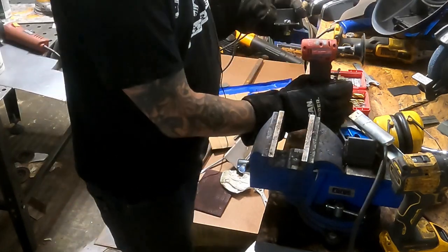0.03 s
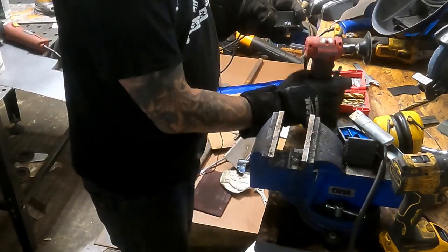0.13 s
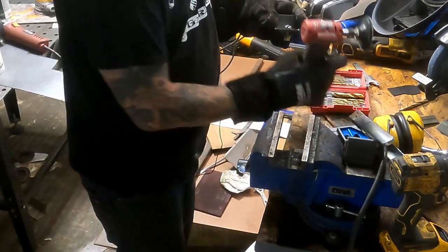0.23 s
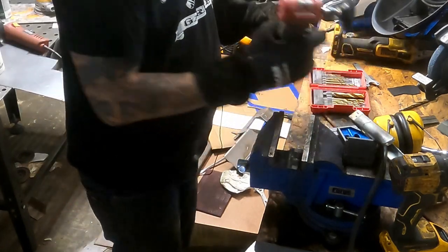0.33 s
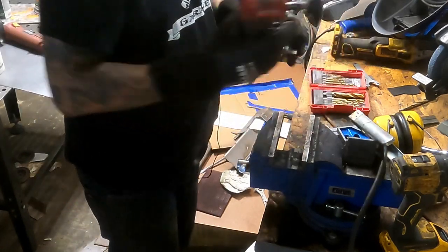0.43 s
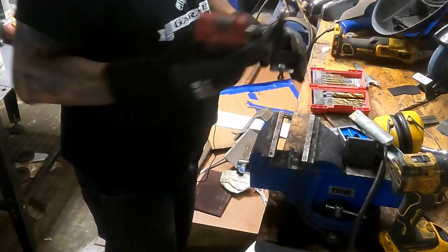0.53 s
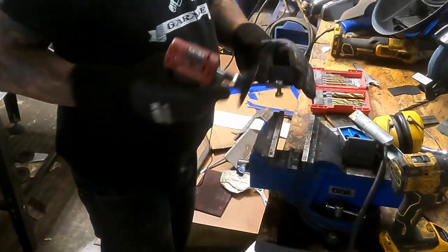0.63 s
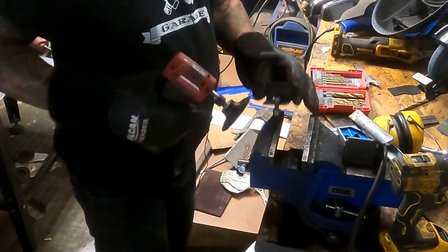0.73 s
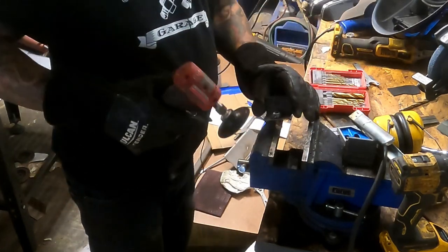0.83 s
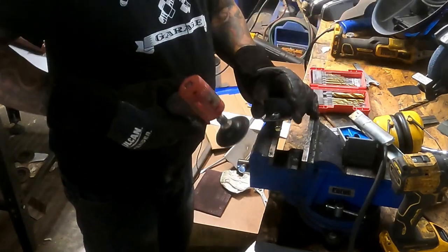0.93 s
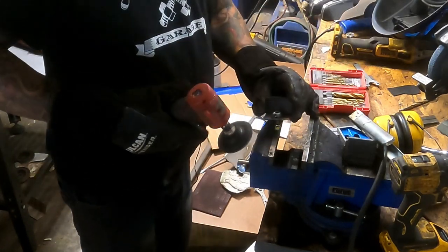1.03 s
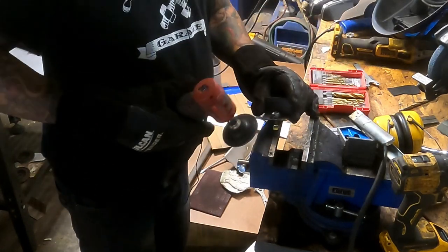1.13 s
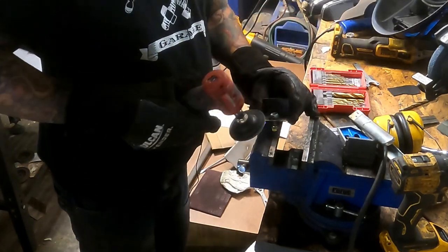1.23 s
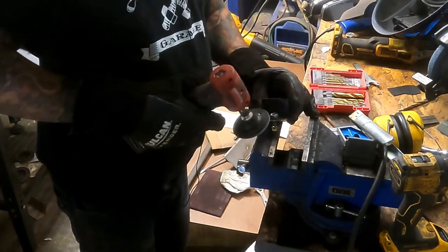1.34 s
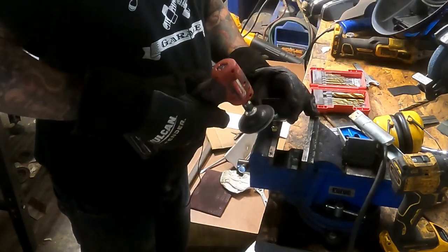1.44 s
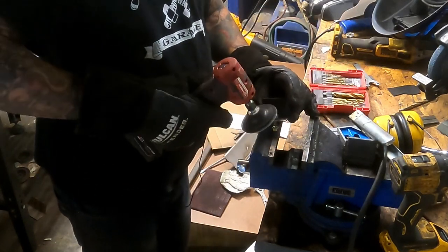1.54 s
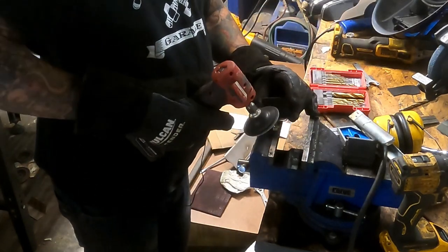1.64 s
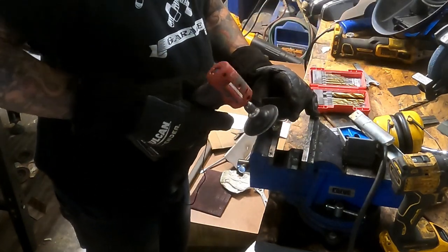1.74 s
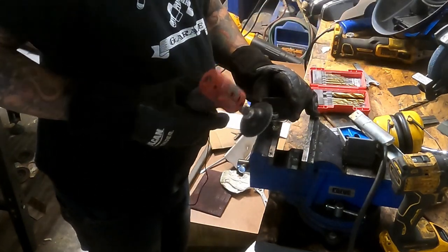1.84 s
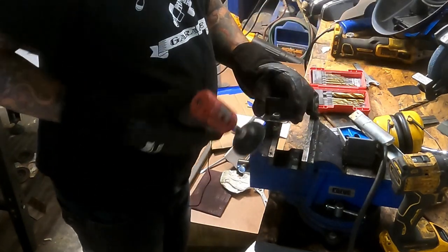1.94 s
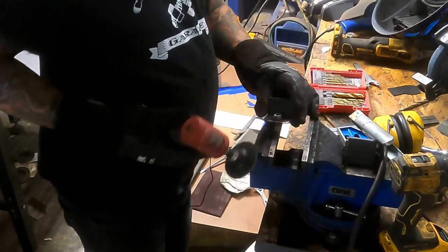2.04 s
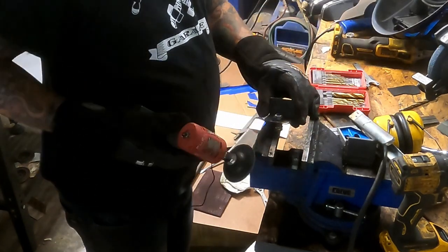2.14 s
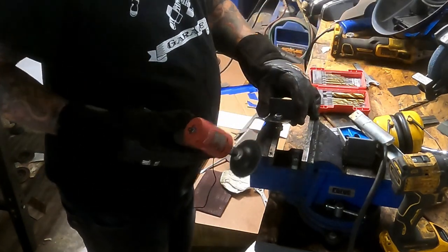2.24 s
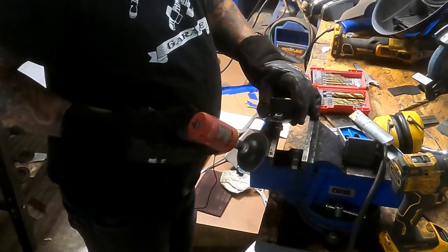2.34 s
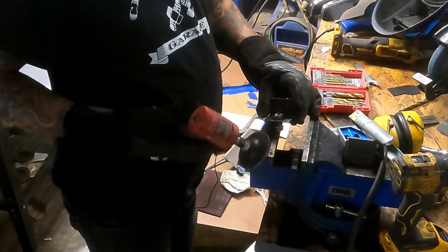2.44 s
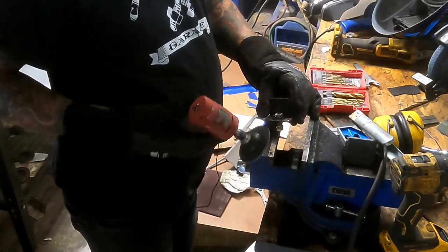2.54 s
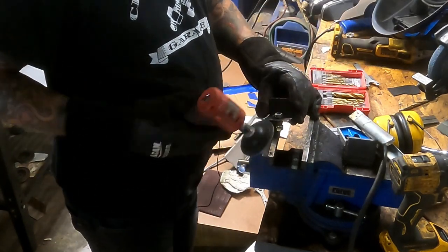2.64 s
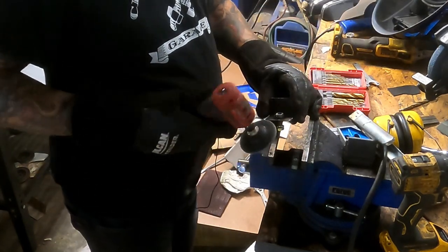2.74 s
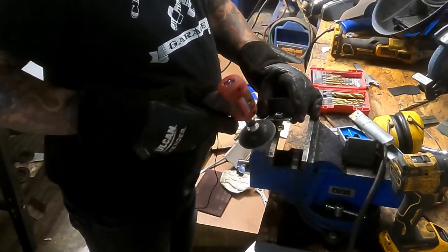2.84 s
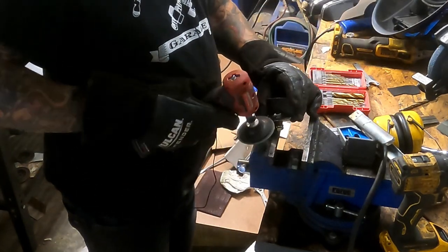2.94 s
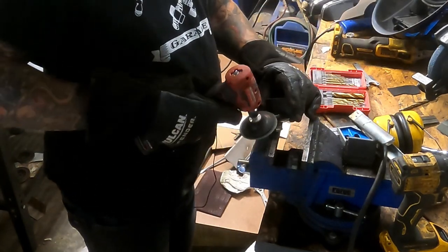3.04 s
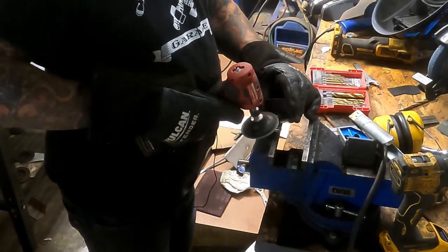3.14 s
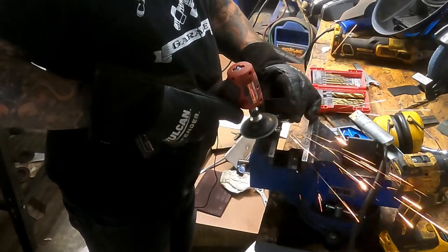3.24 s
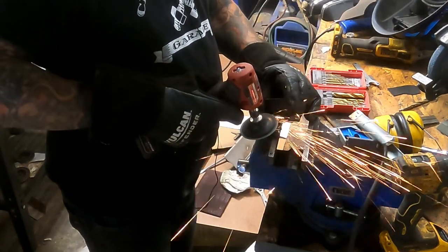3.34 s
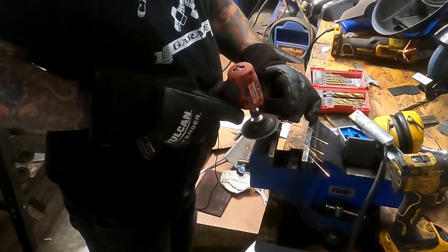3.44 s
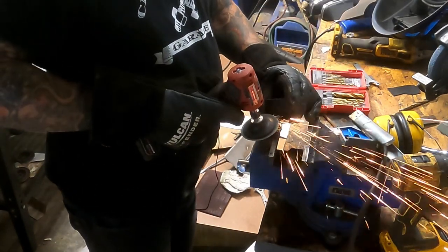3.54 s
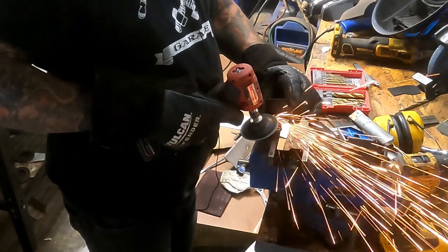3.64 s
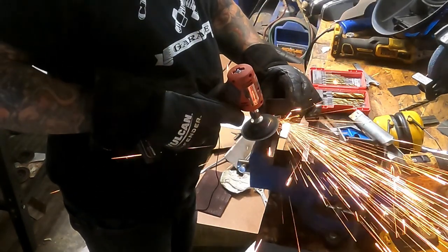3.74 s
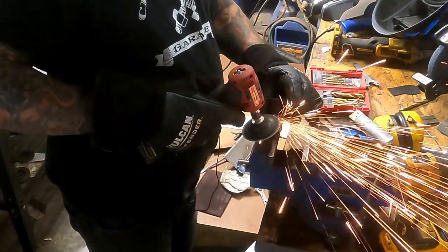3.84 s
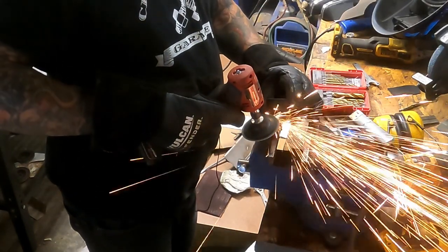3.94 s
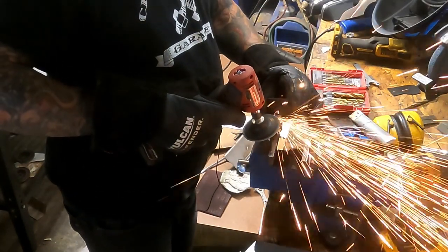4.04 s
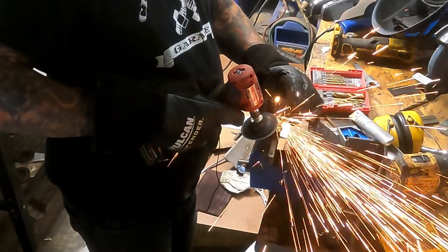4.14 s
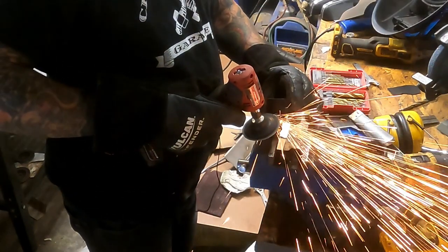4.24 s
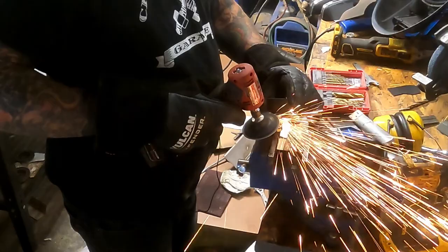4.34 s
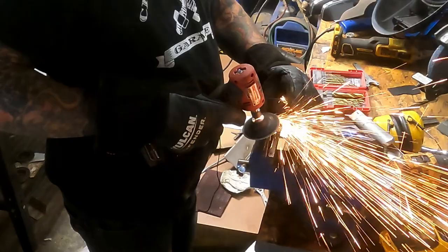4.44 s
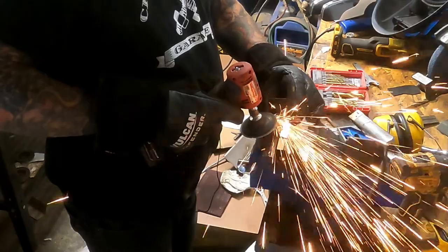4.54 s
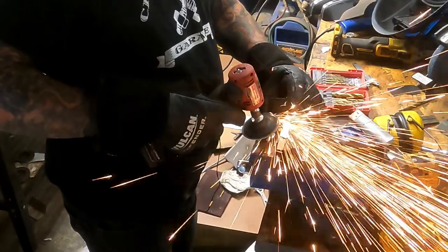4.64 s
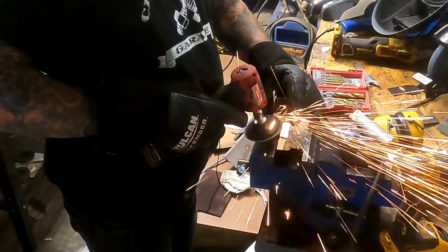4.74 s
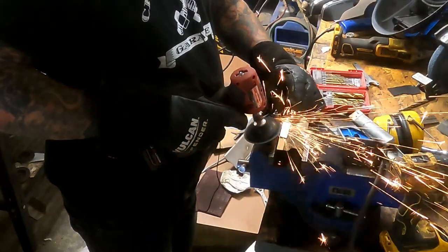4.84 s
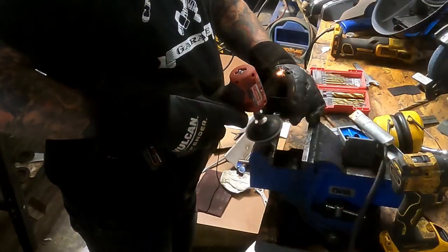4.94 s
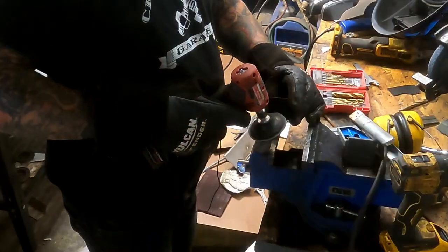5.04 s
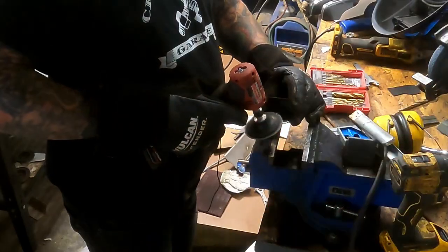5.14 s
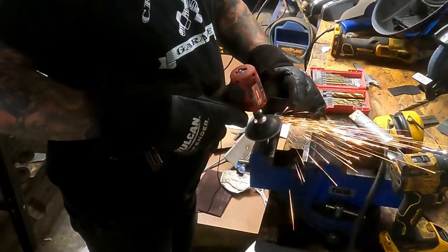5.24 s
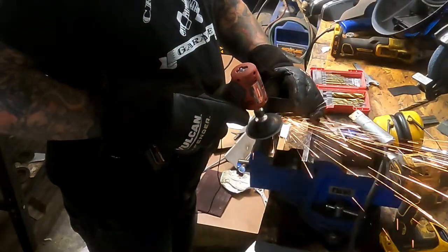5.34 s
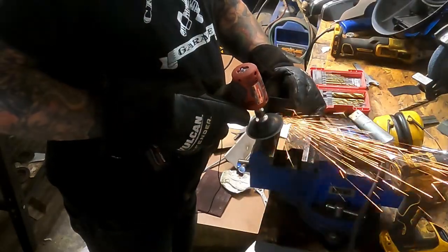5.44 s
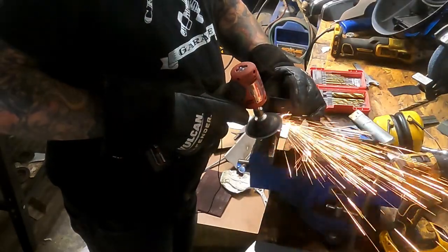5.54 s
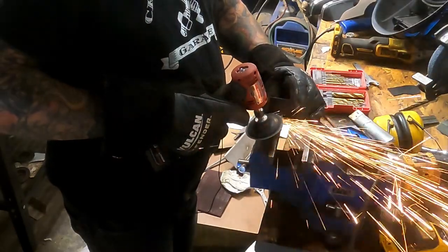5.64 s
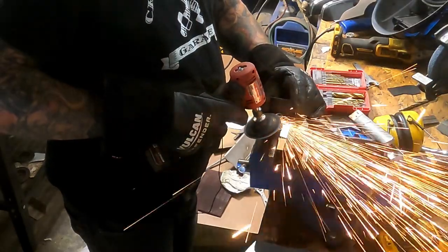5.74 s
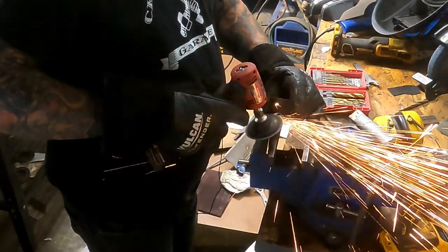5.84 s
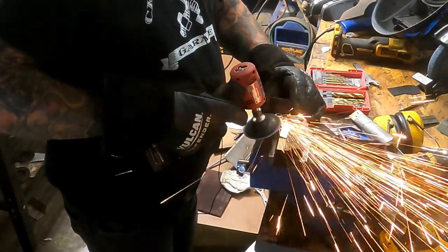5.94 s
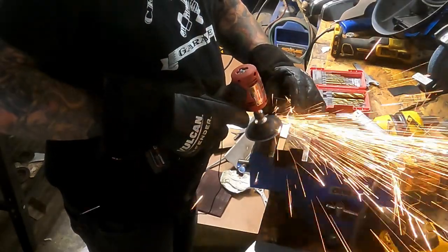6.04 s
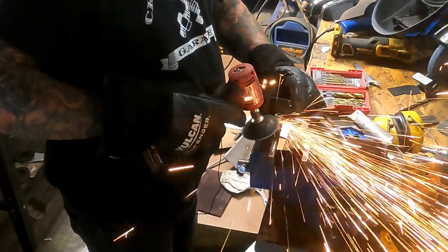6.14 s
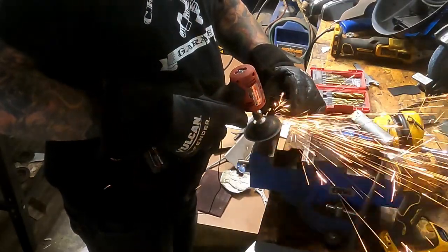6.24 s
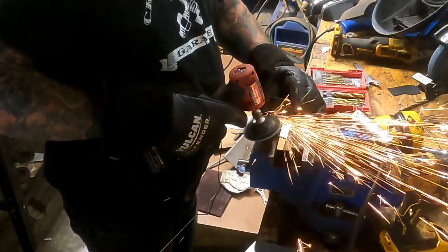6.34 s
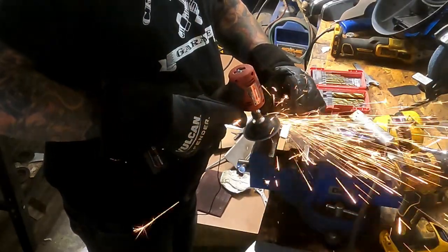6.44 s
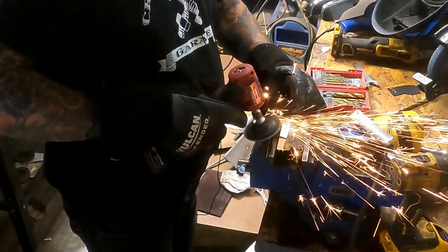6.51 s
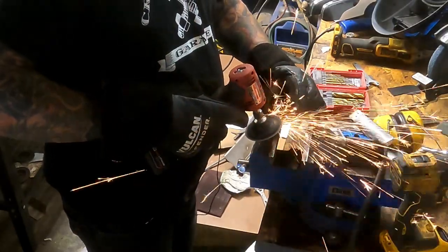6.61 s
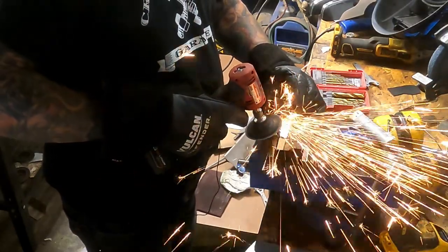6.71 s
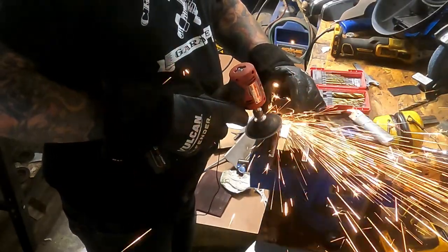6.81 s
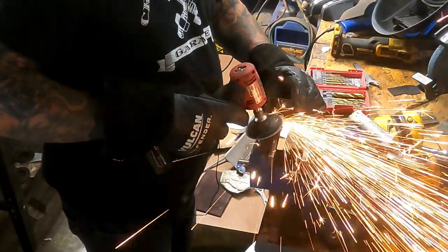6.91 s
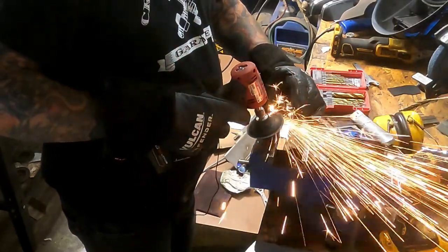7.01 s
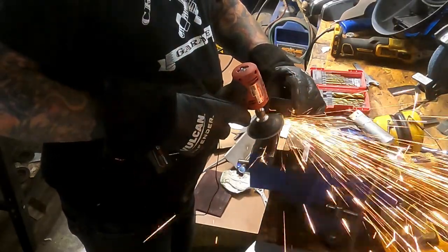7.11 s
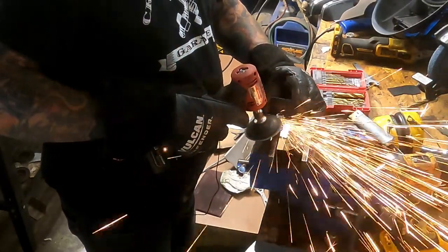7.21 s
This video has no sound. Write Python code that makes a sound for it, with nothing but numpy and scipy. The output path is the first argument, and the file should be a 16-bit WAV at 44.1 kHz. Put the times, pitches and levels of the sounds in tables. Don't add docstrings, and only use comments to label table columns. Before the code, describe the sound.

Close, nearly mono workshop sound: quiet room tone, sleeve rustles, a dull knock, a bright clink and a sharp set-down tick. After a quiet stretch, a handheld grinder is handled and started, rising swiftly into a whirr. Two short scrapes lead into a long, piercing metal grind whose pitch sags with each push. A short free-running gap follows, then a second harsh pass that continues to the cut. Background sinks beneath the loud grinding.

```python
import sys
import numpy as np
from scipy import signal
from scipy.fft import rfft, irfft
from scipy.io import wavfile
from scipy.ndimage import uniform_filter1d, minimum_filter1d, map_coordinates

SR = 44100
rng = np.random.default_rng(int(sys.argv[2]) if len(sys.argv) > 2 else 0)


def waveform_to_disk(signal):
    frames = np.transpose(np.atleast_2d(signal))
    scaled = np.clip(frames, -1, 1) * 32767
    samples = np.round(scaled).astype(np.int16)
    wavfile.write(sys.argv[1], SR, samples)


def boost_factor(decibels):
    exponent = np.asarray(decibels, float) / 20
    return 10 ** exponent


N = 320607
T = np.arange(N) / SR
TRIGGER_S, FIRST_TOUCH_S = 2.678, 3.197
BEARING_RATIO = 2.565


# (frequency [Hz], width [Hz], level [dB])
STEEL_MODES = [(800, 190, -28), (1050, 110, -22.5), (1336, 285, -19), (1686, 146, -12), (2076, 168, -4),
               (2300, 159, 0), (2584, 180, 0.5), (2890, 340, -6), (3430, 605, -7), (4996, 750, 0),
               (6340, 910, -6), (7210, 664, 0.5), (8200, 660, -5), (9300, 810, -5), (10270, 920, -0.5),
               (11800, 910, -1.5), (12880, 440, -8), (13440, 500, -13.5), (14520, 480, -12),
               (15360, 250, -17), (4340, 1180, -13)]
# (time [s], frequency [Hz], level [dB], half
# length [s])
CONTACT_CHANGES = [(3.715, 8100, 0.5, 0.3), (3.786, 12100, -6.5, 0.27), (3.85, 14500, 7.5, 0.35),
                   (3.95, 12900, 3, 0.44), (3.857, 2080, 0, .25), (7.15, 6340, 1, 0.092), (4.7, 4740, 3, 0.13),
                   (5.726, 6940, 7.5, 0.046), (5.916, 6760, 5.5, 0.099), (3.9, 2960, -4.5, 0.33),
                   (3.99, 2450, 4, 0.068), (4.311, 7300, 2, 0.15), (4.364, 2040, -4.5, 0.16),
                   (4.57, 12200, -3.5, 0.52), (4.735, 1850, 7.5, 0.77), (4.792, 2870, 11, 0.021),
                   (4.874, 8200, -5.5, 0.11), (4.5, 2630, 6, 0.019), (4.915, 2280, 6, 0.032),
                   (4.89, 6300, -3, 0.06), (5.735, 2070, -5, 0.08), (5.762, 3550, 4, 0.66),
                   (5.929, 2500, -6.5, 0.11), (5.933, 1660, 13.5, 0.16), (5.95, 2050, -3, 0.065),
                   (6.146, 6100, -6, 0.087), (6.142, 2270, 4.5, 0.017), (6.181, 2780, 8, 0.016),
                   (6.247, 11200, 2.5, 0.33), (6.47, 2490, -6, 0.13), (6.48, 7500, -6.5, 0.43),
                   (6.5, 4530, 5, 0.17), (6.638, 1980, 6.5, 0.24), (7.097, 4500, 5.5, 0.11),
                   (7.097, 1920, -14, 0.1),
                   (3.56, 1830, 7.5, 0.21), (3.56, 7000, 3, 0.12), (4.04, 8800, 2, .25), (3.78, 3500, 2.5, 0.1),
              (4.3, 14400, -4, 0.33), (4.75, 15400, -10, .08), (4, 12900, 3, 0.13), (5.3, 1450, 14, 0.092),
              (4.88, 1300, 16.5, 0.077), (4.76, 2800, 2, 0.032), (4.88, 14400, 8, 0.066),
              (4.4, 8500, -1.5, .07), (6.1, 10400, 3, 0.034), (4.45, 7200, 3, 0.075), (4.3, 7200, 4, 0.016),
              (7, 6900, 4.5, 0.023), (6.4, 10500, 3.5, 0.045), (5.8, 8100, -5, 0.09), (5.45, 6100, 4, 0.13),
              (5.5, 12700, 6, 0.13), (6.3, 5200, -1.5, .1), (5.72, 7500, -2.5, 0.083),
              (6.9, 5500, -0.5, 0.14), (5.8, 1300, 6, 0.093), (6.8, 1600, 1, 0.23), (5.3, 6700, -4, 0.057),
              (7.2, 3500, 4.5, 0.079), (7.9, 3400, 3, 0.053), (8.4, 3700, -6, 0.075), (7.02, 8200, 4, 0.16),
              (6.43, 5200, 2.5, 0.32), (7.05, 2330, 3.5, 0.13)]
# (time [s], frequency [Hz], level [dB], half length [s])
LANDING_RINGS = [(3.19, 2780, 2.5, 0.024), (3.205, 1710, -6, 0.043), (3.217, 7140, 6.5, 0.034),
                 (3.22, 4170, 1, .06), (3.23, 11800, -3, .05), (3.24, 14500, 7, .06),
                 (3.217, 2170, -10, 0.045), (3.373, 2340, 2, 0.031), (3.38, 3900, -1, .06),
                 (3.378, 7900, 3.5, .04), (3.385, 9900, 1, 0.036), (3.39, 14500, 9, 0.066),
                 (3.5, 7500, 3, 0.0097), (3.508, 9300, 5, 0.025), (3.51, 2280, -18, 0.032),
                 (3.525, 5440, -2, 0.022), (3.537, 3040, 5, 0.025), (5.298, 5240, 6.5, 0.016),
                 (5.304, 2200, 2.5, 0.055), (5.245, 2590, 8.5, 0.018)]


def steel_modes(scrapes, repeating_scrape):
    changes = CONTACT_CHANGES + LANDING_RINGS

    def near(hz, centre_hz):
        spread = .15 if hz < 10000 else .07
        return np.exp(-(np.log(hz / centre_hz) / spread) ** 2)

    groups, plain = [0, 0, 0.0017, 0.00049], [0, 0, 0, 0]
    for k, (hz, width_hz, db) in enumerate(STEEL_MODES):
        group = (hz > 3700) + (hz > 5500) + (hz > 10000)
        favoured_db = bumps([(s, lift_db * near(hz, at_hz), half_s)
                             for s, at_hz, lift_db, half_s in changes if near(hz, at_hz) > .05])
        fresh_edge_db = 6.1 * (hz > 12500) * np.exp(-((T - 3.2) / 1.4) ** 2)
        force = scrapes[group] if hz > 1500 else repeating_scrape
        mode = (-1) ** k * boost_factor(db) * ring(ring(force, hz, 1.73 * width_hz), hz, 1.56 * width_hz)
        groups[group] += boost_factor(favoured_db + fresh_edge_db + 0.91 * walk(11)) * mode
        plain[group] += mode
    steel = 0
    for moving, steady, group_db in zip(groups, plain, [-8, -9, 0, -7]):
        steel = steel + boost_factor(group_db) * moving / np.sqrt(uniform_filter1d(steady ** 2, size=3000))
    return steel


def grit(turns, memory, size=300):
    grains = rng.standard_normal((1600, size))
    rim = signal.lfilter([np.sqrt(1 - memory ** 2)], [1, -memory], grains, axis=0)
    return map_coordinates(rim.ravel(), [turns * size], order=3)


# (time [s], change of share [0-1], half length [s])
RATTLES_PER_TURN = [(3.197, 0.56, 0.0072), (3.27, 0.91, 0.059), (3.34, 0.79, 0.02), (3.41, 0.8, 0.051),
                    (3.478, 0.64, 0.021), (3.59, 0.3, 0.038), (3.83, 0.29, 0.057), (4.45, -0.058, 0.027),
                    (4.55, 0.033, 0.064), (4.65, 0.29, 0.071), (4.89, 0.054, 0.019), (6.12, -0.069, 0.053),
                    (5.261, 0.34, 0.0053), (5.37, 0.39, 0.048), (5.43, -0.012, .03), (5.9, 0.2, 0.064),
                    (6.53, -0.16, 0.036), (6.7, -0.16, 0.09), (6.86, 0.67, 0.066), (7.02, -0.19, .02)]


def contact_force(turns, fresh):
    angle = 2 * np.pi * (turns + 0.21 + 0.058 * walk(4))
    second = np.clip(.35 + .4 * walk(6), 0, 1)
    high = np.exp(8.7 * (np.cos(angle) - 1)) + second * np.exp(4.0 * (np.cos(angle + 2.95) - 1))
    spot = np.clip(0.36 + 0.072 * walk(7) + bumps(RATTLES_PER_TURN) + 0.12 * fresh, 0, .92)
    contact = 1 - spot + 2.1 * spot * high
    return contact / np.sqrt(uniform_filter1d(contact ** 2, size=1500))


# (time [s], share [0-1], half length [s])
FRESH_METAL = [(4.16, .6, .025), (4.31, .6, .03), (4.55, .72, .05), (4.73, .45, .04), (4.83, .6, .035),
               (4.91, .6, .035), (5.29, .75, .04), (5.53, .4, .03), (5.63, .55, .035), (5.82, .45, .03),
               (6.08, .8, .05), (6.2, .55, .03), (6.64, .6, .035), (6.82, .45, .025), (6.98, .5, .035),
               (7.18, .65, .055)]


def smear(grains, share):
    return np.sqrt(1 - share ** 2) * grains + share * rng.standard_normal(N)


def scraping(turns, fresh):
    contact = contact_force(turns, fresh)
    repeating, fine = grit(turns, memory=.968), grit(turns, memory=.93)
    acceleration = np.gradient(np.gradient(turns)) * SR ** 2
    skid = np.clip(np.abs(acceleration) / 800, 0, 1)
    skid = np.maximum(skid, .8 * (T < 3.59))
    coarse = repeating + skid * rng.standard_normal(N)
    fine = fine + .5 * skid * rng.standard_normal(N)
    slide = np.clip(bumps(FRESH_METAL), 0, .95)
    worn = np.maximum(slide, np.interp(T, [4.1, 4.4], [.15, .5]))
    coarse, finest, fine = smear(coarse, 0.61 * slide), smear(fine, worn), smear(fine, slide)
    return [contact * g for g in (coarse, fine, fine, finest)], contact * repeating


# (touch [s], let go [s], first graze [dB], strike [dB], rise [s])
TOUCHES = [
    (3.197, 3.241, -19, -10, 0.017),
    (3.344, 3.386, -26.5, -15, 0.02),
    (3.478, 4.913, -31.5, -15, 0.026),
    (5.257, 7.506, -17.5, -13.5, 0.037),
]
# (time [s], level [dB], half length [s])
PRESSURE_CHANGES = [(4.545, -0.5, .04), (4.45, 1.5, 0.034), (5.92, -0.5, 0.024), (3.58, -7.5, 0.013),
                    (4.27, -1.44, 0.66), (5.32, 4.5, 0.0073), (5.38, -3, 0.052), (5.5, 1, 0.031),
                    (5.83, -2, 0.041), (6.01, -3.5, 0.052), (6.33, 1.8, 0.026), (6.34, 0.9, 0.21),
                    (6.43, -2, 0.028), (6.7, 0.9, 0.058), (7.07, -2.5, 0.054)]


def bite():
    hold_db, settle_s = -18.5, 0.0046
    bounce_db_per_s, lift_db_per_s, parting_db_per_s2 = 108, 293, 3000
    bite_db, fresh = np.full(N, -140.), np.zeros(N)
    for touch_s, let_go_s, graze_db, strike_db, rise_s in TOUCHES:
        release = lift_db_per_s if let_go_s - touch_s > .5 else bounce_db_per_s
        since, leaving = T - touch_s, np.maximum(T - let_go_s, 0)
        strike = np.exp(-np.maximum(since - rise_s, 0) / settle_s)
        db = hold_db + (strike_db - hold_db) * strike
        db -= (strike_db - graze_db) * np.clip(1 - since / rise_s, 0, 1)
        db -= release * leaving * (1 + leaving * parting_db_per_s2 / bounce_db_per_s)
        bite_db = np.where(since > 0, np.maximum(db, bite_db), bite_db)
        fresh = np.where(since > 0, np.sqrt(strike), fresh)
    skip = (4.82, -11, .006)
    return bite_db + bumps(PRESSURE_CHANGES + [skip]), fresh


# (multiple of shaft rate, level [dB])
LOADED_ORDERS = [(1, -4.5), (2, -4), (4, -20), (5, -1.5), (6, -14), (7, -6), (8, -4.5), (9, -8)]


def shaft_thrum(turns):
    vice_hz, vice_db_per_hz = 491, 0.27
    knocks = stack(BEARING_RATIO * turns, [(2, -12.0), (3, -0.5)], flicker_db=0)
    knocks = knocks * (1 + 0.8 * np.cos(2 * np.pi * turns))
    off_ring_hz = np.maximum(3 * np.gradient(turns) * SR - vice_hz, 0)
    third_db = bumps([(4.45, -5.5, 0.23)]) - vice_db_per_hz * off_ring_hz
    third = boost_factor(third_db) * stack(turns, [(3, 5.5)], flicker_db=0.7)
    return stack(turns, LOADED_ORDERS, flicker_db=2.2) + knocks + third


def grinding(turns):
    bite_db, fresh = bite()
    scrapes, repeating_scrape = scraping(turns, fresh)
    steel = steel_modes(scrapes, repeating_scrape)
    sag = 166 - np.gradient(turns) * SR
    thrum_db = 0.51 * bite_db - 44.5 + .1 * np.minimum(sag, 20)
    thrum_db -= 1.16 * (T - 5.5)
    thrum_db -= 2.0 * fresh + 2.8 * (T < 3.48)
    return boost_factor(bite_db) * steel + boost_factor(thrum_db) * shaft_thrum(turns)


# (time [s], shaft rate [turns per s])
LEANED_SPEED = [(3.2, 156.6), (3.32, 163.4), (3.479, 167.3), (3.84, 166.2), (4.447, 169.2), (4.69, 167.7),
                (4.78, 182.5), (4.83, 178), (4.94, 170.3), (4.978, 180.6), (5.07, 180), (5.25, 174.8),
                (5.44, 164), (5.87, 169.2), (6.298, 172.9), (6.637, 171.5), (7.07, 170), (7.27, 164.1)]
# (time [s], sag [turns per s], half length [s])
DIG_SAGS = [(3.257, 5.6, 0.056), (3.41, 8.0, 0.047), (3.536, 5.7, 0.041), (3.673, 5.0, 0.103),
            (4.008, 3.6, 0.093), (4.198, 7.4, 0.07), (4.375, 5.8, 0.045), (4.55, 17.3, 0.06),
            (5.335, 9.9, 0.059), (5.522, 6.6, 0.051), (5.621, 10.3, 0.066), (5.773, 7.0, 0.078),
            (5.958, 5.7, 0.056), (6.15, 14.3, 0.077), (6.459, 6.1, 0.12), (6.763, 5.8, 0.077),
            (6.941, 9.8, 0.077), (7.235, 7.2, 0.049)]


def shaft():
    since = np.maximum(T - TRIGGER_S, 0)
    spin_up = 158 * (1 - np.exp(-since / .1)) ** 3.4
    spin_up = spin_up + bumps([(2.71, 5.5, .028)])
    loaded = np.interp(T, *np.transpose(LEANED_SPEED)) - bumps(DIG_SAGS)
    return uniform_filter1d(np.where(T < FIRST_TOUCH_S, spin_up, loaded), size=1800)


# (shaft multiple, level [dB])
WHINE_SIDEBANDS = [(-4, -45), (4, -48.5), (-8, -54), (0, -66)]


def switching_whine(turns, duck):
    def wave(multiple, k):
        return np.sqrt(2) * np.sin(2 * np.pi * (multiple * 7765 * T + k * turns))

    dips_db = bumps([(4.94, -10, .05), (5.1, -2.5, .3), (5.26, -9, .07)])
    whine = sum(boost_factor(db + 1.8 * walk(13) + (k == 4) * dips_db) * wave(1, k) for k, db in WHINE_SIDEBANDS)
    whine_db = 10 - 5 * np.exp(-np.maximum(T - TRIGGER_S, 0) / .04)
    octave = boost_factor(-66) * (wave(2, -4) + wave(2, 4)) * np.exp(-np.maximum(T - 2.75, 0) / .08)
    step = 1 / (0.13 * SR)
    slow_duck = signal.lfilter([step], [1, step - 1], duck ** 2, zi=[1.])[0]
    return (T > TRIGGER_S + 0.005) * (slow_duck * boost_factor(whine_db) * whine + octave)


# (multiple of shaft rate, level [dB])
FREE_ORDERS = [(1, -6), (3, -20), (4, -13.5), (6, -22), (8, -24), (9, -27), (10, -15), (11, -20), (12, 0.5),
               (13, -1.5), (14, 0), (15, -16), (16, -9)]
# (multiple of ball rate, level [dB])
BALL_ORDERS = [(1, -66), (3, -53), (4, -61), (5.39, -54), (6, -52), (7, -51), (8, -63), (10, -59),
               (11, -64)]


def shaft_hum(turns, duck):
    balls = stack(BEARING_RATIO * turns, BALL_ORDERS, flicker_db=1.5)
    hum = boost_factor(-47.5) * stack(turns, FREE_ORDERS, flicker_db=0)
    hum = hum + np.interp(T, [3.2, 4.9], [.4, .9]) * duck ** 2 * balls
    return (np.gradient(turns) * SR / 170) ** 6 * hum


# (multiple of shaft rate, level [dB])
WHIRR_ORDERS = [(20.5, -55), (24, -57), (25.65, -53), (28, -53), (30.5, -58), (32, -57), (35, -54),
                (37, -59), (41, -54), (44, -60), (54, -60), (61, -59), (70, -60)]


def housing_whirr(turns):
    whirr = stack(turns, WHIRR_ORDERS, flicker_db=3.0)
    hollow = band(band(whirr, 3700, 7400), 3600, 6700) + 2.7 * ring(whirr, 3770, 201)
    return hollow + level(ring(rng.standard_normal(N), 3800, 70), -54)


# (frequency [Hz], density [dB per Hz])
FAN_START_SPECTRUM = [(470, -49), (800, -18.5), (2260, -18.5), (3790, -0.5), (4180, -8), (6410, -6),
                      (7080, -9), (8440, -13), (9330, -14.5), (16000, -48)]
# (frequency [Hz], density [dB per Hz])
FAN_RUN_SPECTRUM = [(120, -4), (200, 4.5), (283, -39), (456, 1), (1250, -23), (2380, 0.5), (4350, -4),
                    (7270, -2), (7680, -3.5), (16000, -23)]


def cooling_fan(turns, duck):
    speed = np.gradient(turns) * SR
    airflow = speed ** 2 / (speed ** 2 + 30 ** 2)
    settled = np.interp(T, [2.95, 3.3], [0, 1])
    starting = hiss(FAN_START_SPECTRUM, -37.5) + housing_whirr(turns)
    running = hiss(FAN_RUN_SPECTRUM, -42.5) + level(ring(rng.standard_normal(N), 2100, 700), -48)
    fan = (1 - settled) * starting + settled * duck * running
    return duck ** 0.25 * airflow * boost_factor(1 + walk(24.42)) * fan


def motor(turns, duck):
    return switching_whine(turns, duck) + shaft_hum(turns, duck) + cooling_fan(turns, duck)


def tick(db, hz, treble_db, treble_hz, t60):
    t = T[:9000]
    noise = rng.standard_normal((2, len(t)))
    snap, tail = np.exp(-t / 0.0015), np.exp(-np.log(1000) * t / t60)
    push = np.sin(2 * np.pi * hz * t) * (t * hz) * np.exp(-t * hz / 0.41) * 5
    body = noise[0] * (snap + 0.25 * tail)
    for _ in range(2):
        body = band(body, 0.7 * hz, 1800 + hz)
    crack = band(noise[1] * (1.56 * snap + 0.24 * tail), 0.29 * treble_hz, 1.37 * treble_hz)
    crack = band(crack, 300, 1.8 * treble_hz)
    return boost_factor(db) * (push + 0.61 * body + 0.54 * boost_factor(treble_db) * crack)


# (time [s], peak [dB], pitch [Hz], treble [dB], treble pitch [Hz])
GLOVE_TICKS = [(0.229, -19.5, 510, -41, 8200), (0.376, -41, 1300, -9, 7410), (0.429, -50, 580, 0, 7050),
               (0.463, -48, 991, 10, 7000), (0.505, -52, 1500, 9, 5800), (0.618, -47, 1520, 8, 5810),
               (.627, -49, 1500, 9, 7000), (0.644, -44.5, 797, 12, 8700), (0.678, -26, 1690, -16, 3500),
               (0.694, -29, 1200, -3, 4090), (0.706, -24.5, 1300, -28, 4080), (1.148, -38, 710, 5, 5410),
               (1.155, -43, 1800, 3, 7500), (1.166, -50, 1800, 4, 7000), (2.45, -33, 2000, -2, 5000),
               (2.038, -45, 600, 5, 5330), (2.744, -28, 1050, -14, 7840)]
# (time [s], peak [dB], pitch [Hz], treble [dB], treble pitch [Hz])
PART_TICKS = [
    (0.074, -36, 470, 14, 5300),
    (0.845, -33, 705, 15.5, 6400),
    (1.137, -26.5, 2000, -5, 7100),
    (2.442, -24, 2000, -1.5, 8900),
]
# (time [s], frequency [Hz], level [dB], decay time T60 [s])
CLINK_TONES = [(.848, 8048, -39, .13), (.848, 6966, -46, .15), (1.035, 8100, -56, .07),
               (1.14, 7200, -50, .06), (.848, 6019, -52, .1), (.826, 70, -38, .08), (1.15, 5400, -50, .08),
               (2.444, 2080, -31, .03), (2.444, 1830, -34, .03), (2.745, 1020, -41, .06),
               (.229, 1900, -33, .02), (.229, 1200, -29, .02), (.229, 3300, -45, .02),
               (1.18, 8100, -58, .1), (2.443, 8888, -48, .08), (2.443, 7138, -52, .07)]


def handling():
    out, t = np.zeros(N), T[:9000]
    for rows, t60 in ((GLOVE_TICKS, 0.02), (PART_TICKS, 0.13)):
        for s, *sound in rows:
            out[int((s + .0015) * SR):][:len(t)] += tick(*sound, t60)
    for s, hz, db, t60 in CLINK_TONES:
        out[int(s * SR):][:len(t)] += boost_factor(db) * np.sin(2 * np.pi * hz * t) * np.exp(-np.log(1000) * t / t60)
    drag = level(ring(rng.standard_normal(N), 1600, 500), -50.5)
    drag += level(ring(rng.standard_normal(N), 680, 300), -48)
    out += drag * np.exp(-((T - .86) / 0.049) ** 2)
    rub = level(ring(rng.standard_normal(N), 4050, 150), -61)
    rub += level(ring(rng.standard_normal(N), 5850, 200), -68)
    out += rub * np.exp(-((T - 2.62) / 0.078) ** 2)
    squeak_hz = np.interp(T, [2.6, 2.63, 2.665], [8100, 8500, 9200]) + 60 * walk(200)
    squeak = np.sin(2 * np.pi * np.cumsum(squeak_hz) / SR)
    return out + boost_factor(-60) * np.exp(-((T - 2.64) / 0.014) ** 2) * squeak


def walls(x, t60, db):
    t = T[:20000]
    tail = band(rng.standard_normal(len(t)), 430, 6200) * np.exp(-np.log(1000) * t / t60) * (t > .004)
    return signal.fftconvolve(x, boost_factor(db) * tail / np.sqrt(np.sum(tail ** 2)))[:N]


# (time [s], half length [s], dull level [dB], bright level [dB])
CLOTH_MOVES = [
    (0.1, 0.12, -59.5, -69),
    (0.446, 0.14, -85, -60),
    (0.75, 0.2, -51.5, -58),
    (1.15, 0.29, -62, -78),
    (2.074, 0.2, -69, -84),
    (2.68, 0.12, -54, -56),
]


def cloth():
    dull_move, bright_move = [bumps([(row[0], boost_factor(row[k]), row[1]) for row in CLOTH_MOVES]) + boost_factor(-72)
                              for k in (2, 3)]
    dull = level(band(rng.standard_normal(N), 590, 3500), -2.9) * dull_move * boost_factor(2 * walk(60.14))
    bright = level(ring(rng.standard_normal(N), 6000, 3300), -4) * bright_move * boost_factor(2 * walk(67.7))
    thud = level(band(rng.standard_normal(N), 53, 220), -7) * dull_move * boost_factor(2.5 * walk(15))
    return (dull + bright + thud) * (T < 3)


# (time [s], half length [s], level [dB])
GUSTS = [(.22, 0.41, -53.5), (0.877, 0.13, -47.5), (1.33, 0.13, -50), (1.904, 0.37, -46.5),
         (2.733, 0.071, -58), (2.97, 0.045, -58), (3.49, 0.22, -39), (4.1, 0.43, -55), (5.687, 0.18, -42),
         (6.107, 0.29, -65)]


def draught():
    gusts = bumps([(s, boost_factor(db), half_s) for s, half_s, db in GUSTS]) + boost_factor(-73)
    return gusts * level(band(rng.standard_normal(N), 16.3, 38.7), -1.5)


# (frequency [Hz], density [dB per Hz])
ROOM_SPECTRUM = [(29, -20), (50, -6), (125, -8.5), (189, -15), (224, -6.5), (299, -12.5), (338, -11),
                 (715, -13), (1280, -17.5), (16200, -39)]


def garage(duck):
    mains = boost_factor(-62 + 2.3 * walk(9.1)) * np.sqrt(2) * np.sin(2 * np.pi * 121 * T)
    room = boost_factor(0.14 * walk(5.337)) * hiss(ROOM_SPECTRUM, -54)
    return duck ** 1.3 * (room + duck * mains) + cloth() + draught()


# (start [s], end [s])
PARTED = [(0, 2.8), (3.18, 3.21), (3.47, 3.51), (3.79, 3.84), (3.998, 4.01), (4.103, 4.11), (4.189, 4.34),
          (4.662, 4.75), (4.96, 5.05), (5.7, 5.75), (5.872, 5.96), (6.335, 6.42), (6.563, 6.64),
          (6.845, 7.04), (7.08, 7)]


def side_signal(mid):
    scramble = band(rng.standard_normal(1600), 20, 16000) / 36
    gate = sum((T > a) & (T < b) for a, b in PARTED)
    side = boost_factor(-19) * signal.fftconvolve(mid, scramble, "same") * gate
    cells = signal.stft(side, nperseg=2048)[2]
    patches = np.kron(rng.random((65, cells.shape[1] // 2 + 1)) < .55, np.ones((16, 2)))
    side = signal.istft(cells * patches[:1025, :cells.shape[1]], nperseg=2048)[1][:N]
    return side * np.where(T < 2.9, boost_factor(-3), boost_factor(3))


def level(x, db):
    return x * boost_factor(db) / np.sqrt(np.mean(x ** 2))


def ring(x, hz, width_hz):
    return signal.lfilter(*signal.iirpeak(min(hz, .45 * SR), hz / width_hz, fs=SR), x)


def band(x, lo_hz, hi_hz):
    return signal.sosfilt(signal.butter(2, [lo_hz, hi_hz], "band", fs=SR, output="sos"), x)


def hiss(points, db):
    hz, gain_db = np.transpose(points)
    bins_hz = np.arange(N // 2 + 1) * SR / N
    shape = np.interp(np.log(bins_hz + 1), np.log(hz), gain_db)
    return level(irfft(rfft(rng.standard_normal(N)) * boost_factor(shape), N), db)


def walk(rate):
    k = int(SR / rate)
    held = np.repeat(rng.standard_normal(N // k + 1), k)
    return 1.96 * uniform_filter1d(uniform_filter1d(held, k), k)[:N]


def stack(turns, orders, flicker_db):
    total = 0
    for k, db in orders:
        tone = np.sin(2 * np.pi * (k * turns + rng.random()))
        total = total + boost_factor(db + flicker_db * walk(14)) * np.sqrt(2) * tone
    return total


def bumps(rows):
    t = T[::64]
    return np.interp(T, t, 0 * t + sum(height * np.exp(-((t - s) / half_s) ** 2) for s, height, half_s in rows))


def scene():
    turns = np.cumsum(shaft()) / SR
    steel = grinding(turns)
    duck = 1 / (1 + uniform_filter1d(np.abs(steel), size=4000) / boost_factor(-22))
    tool, hands = steel + motor(turns, duck), handling()
    echo = walls(tool + band(hands, 2000, 12000), 0.092, -12.5)
    slow_duck = minimum_filter1d(duck, size=30001, origin=14000)
    mid = tool + hands + echo + garage(slow_duck)
    side = side_signal(mid)
    return np.array([mid + side, mid - side])


def top_cut(x):
    return signal.sosfilt(signal.butter(12, 15760, fs=SR, output="sos"), x)


def record(dry):
    mix = np.tanh(1.106 * dry) / 1.039
    return top_cut(mix)


dry = scene()
out = record(dry)
waveform_to_disk(out)
```